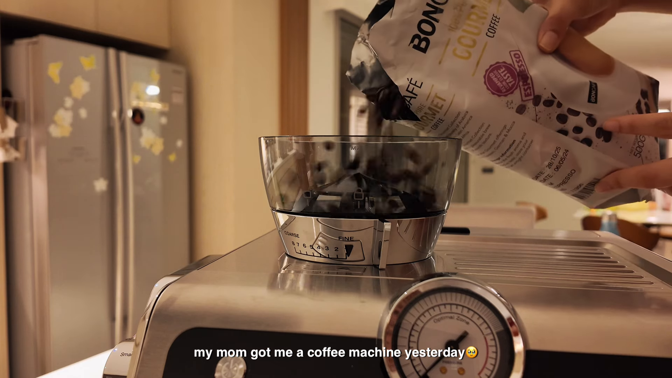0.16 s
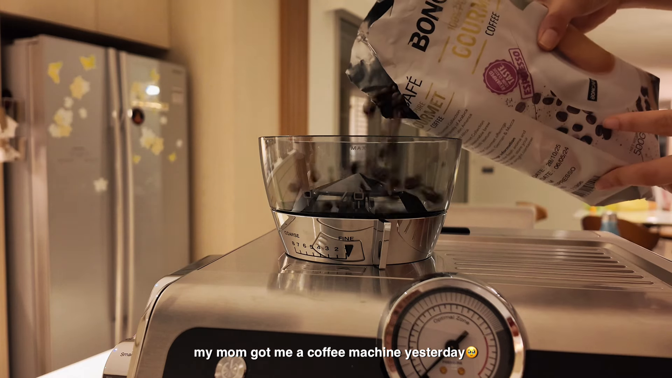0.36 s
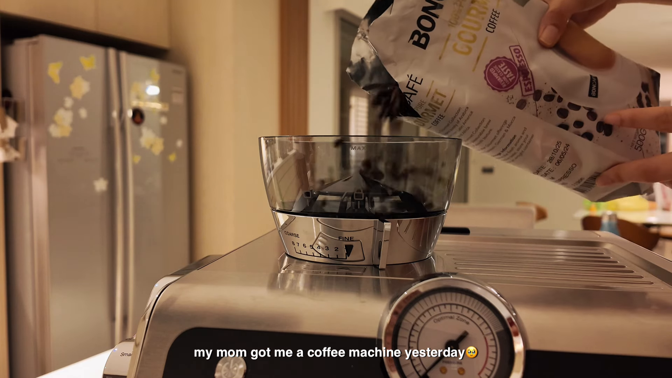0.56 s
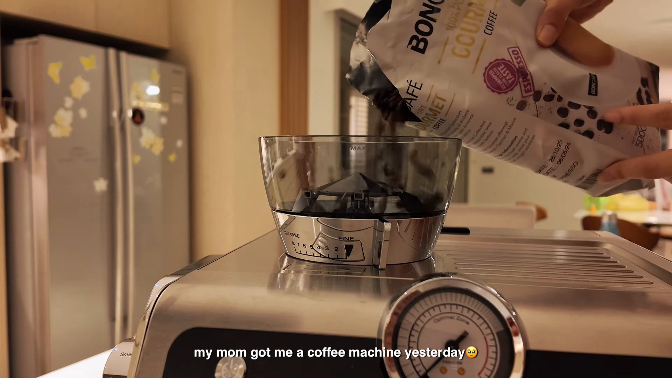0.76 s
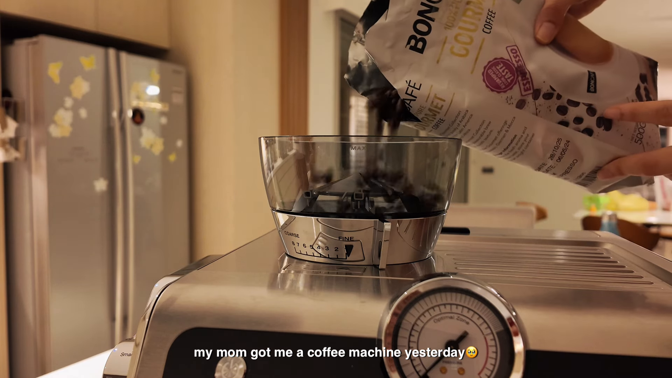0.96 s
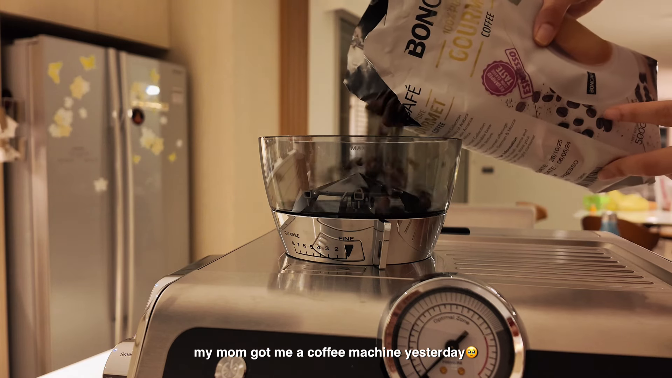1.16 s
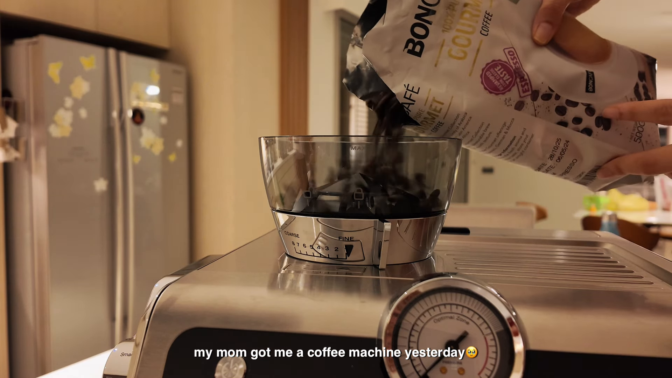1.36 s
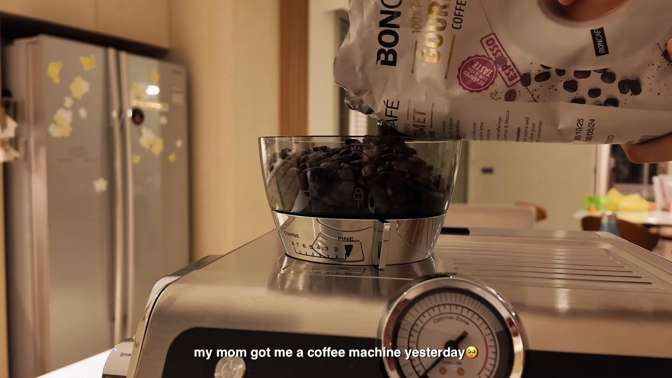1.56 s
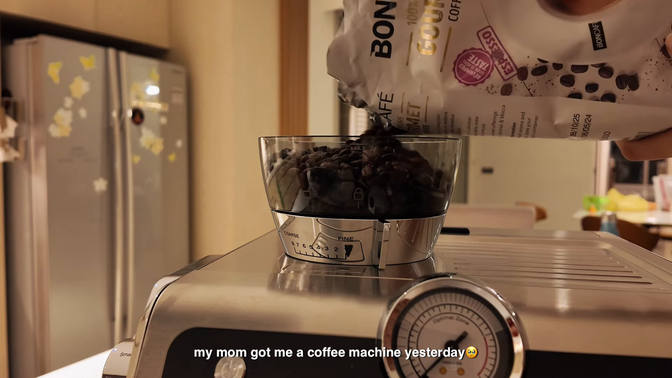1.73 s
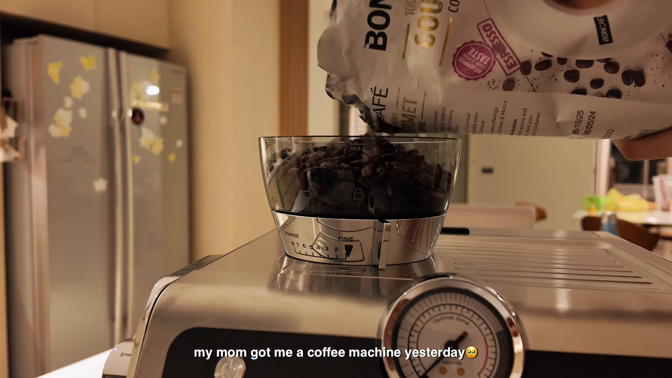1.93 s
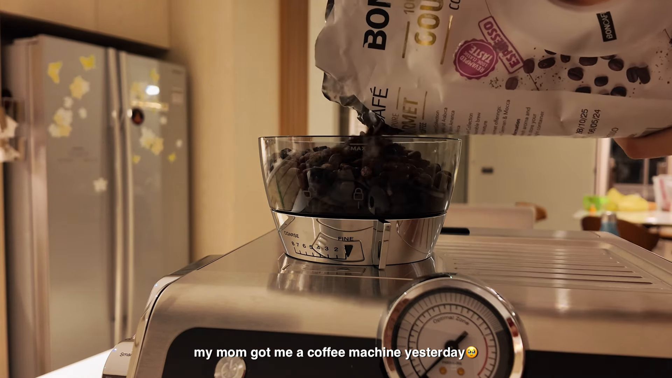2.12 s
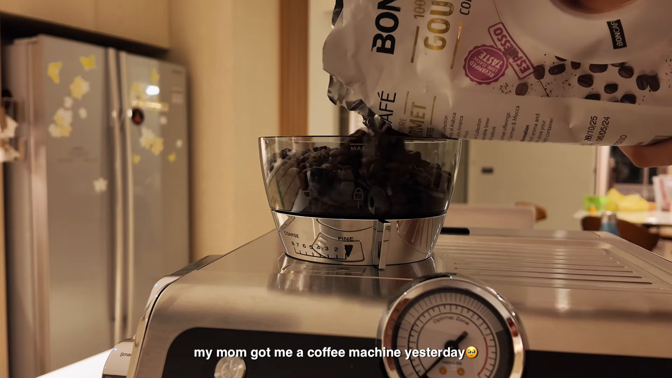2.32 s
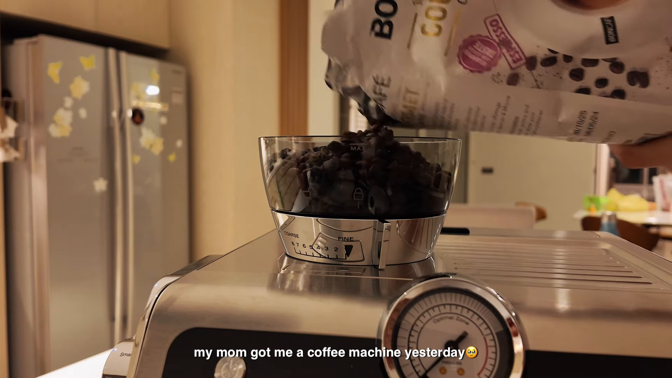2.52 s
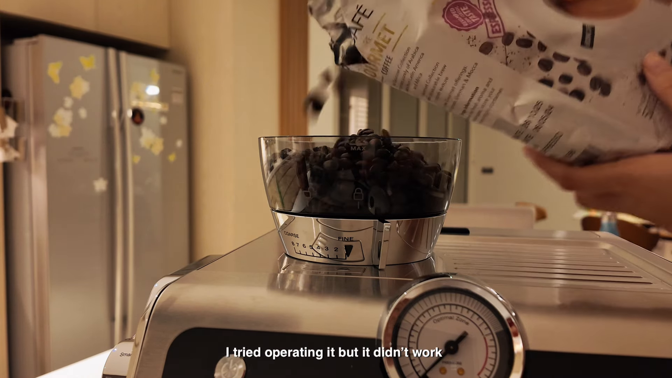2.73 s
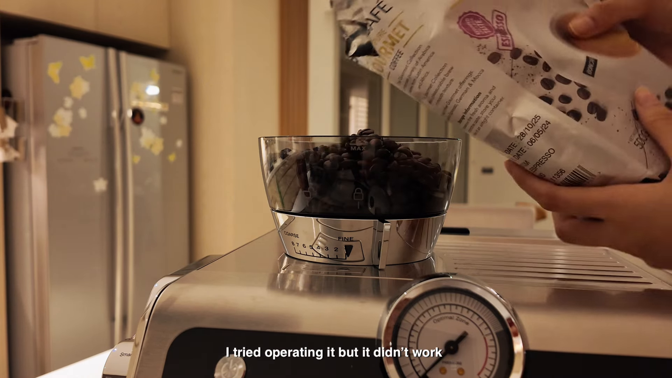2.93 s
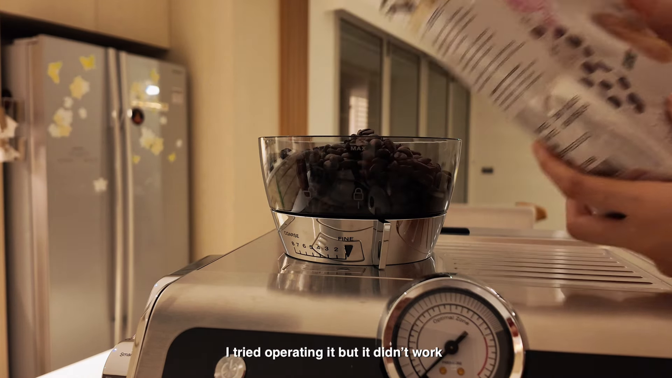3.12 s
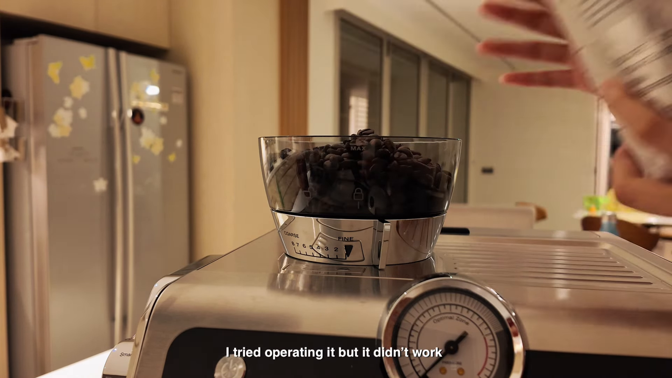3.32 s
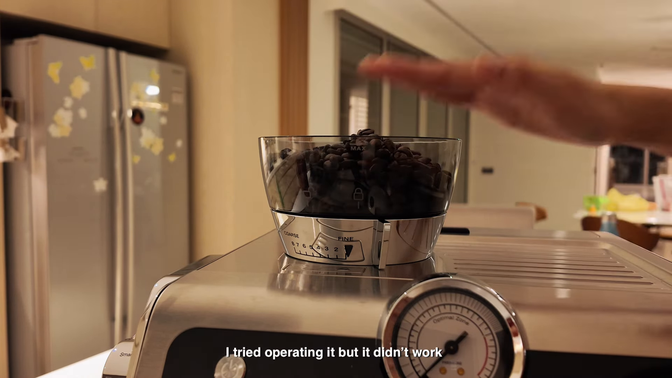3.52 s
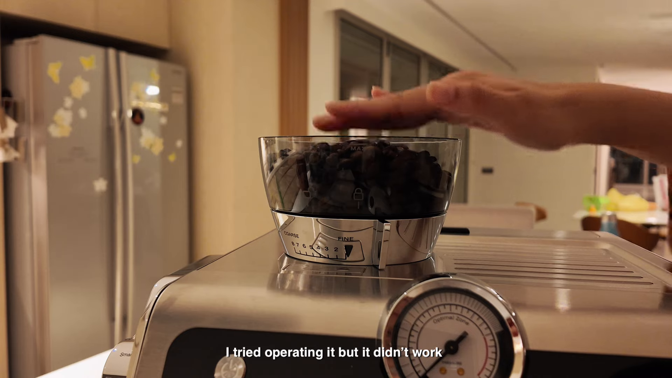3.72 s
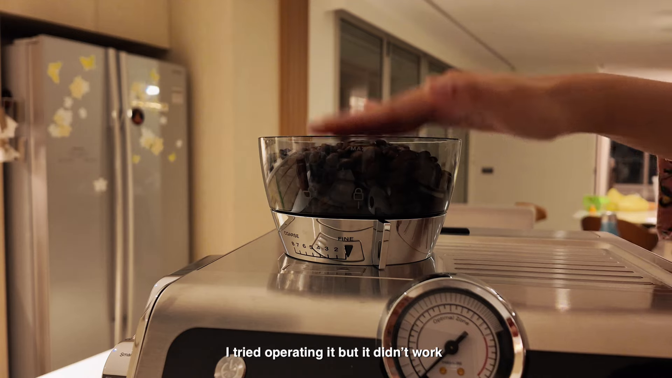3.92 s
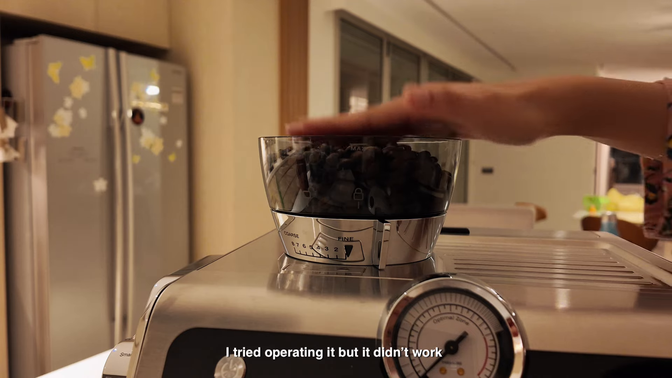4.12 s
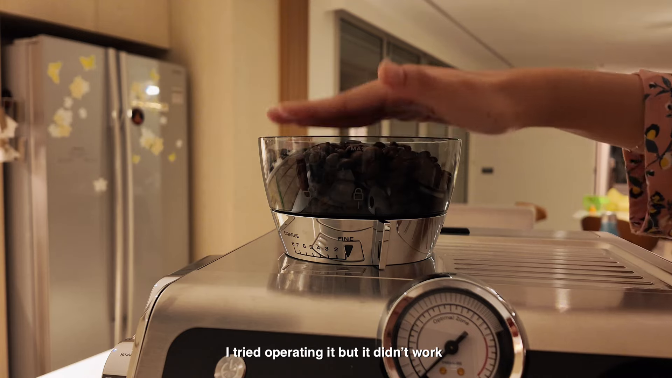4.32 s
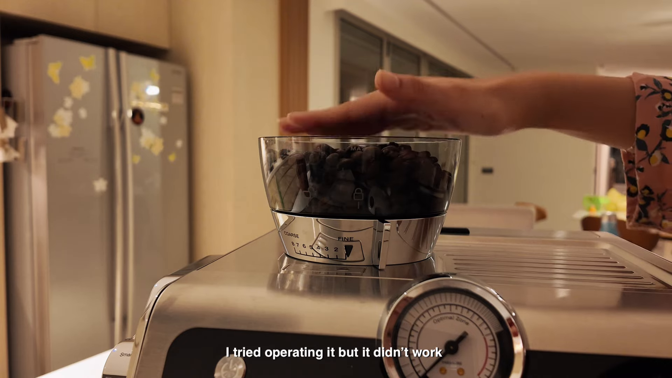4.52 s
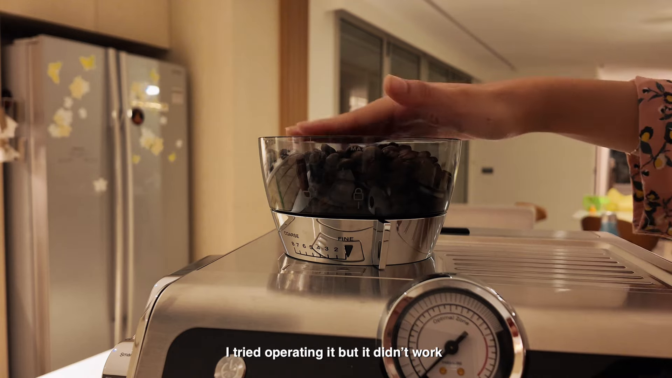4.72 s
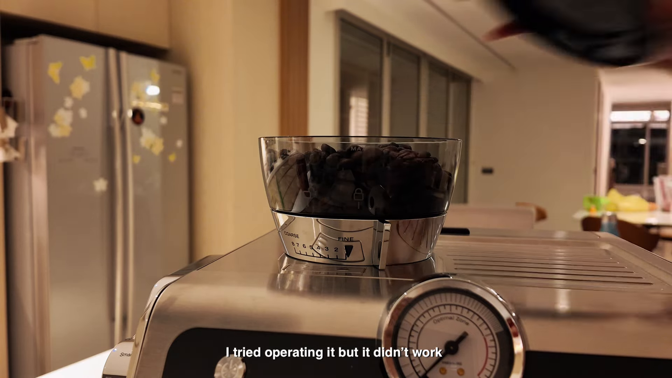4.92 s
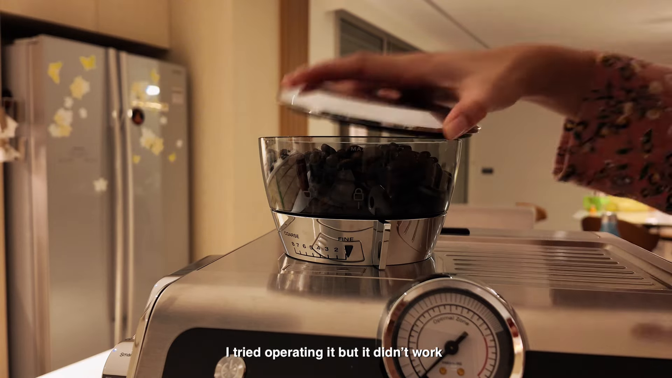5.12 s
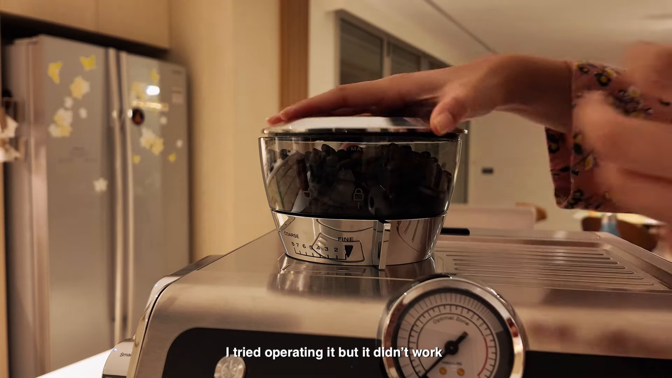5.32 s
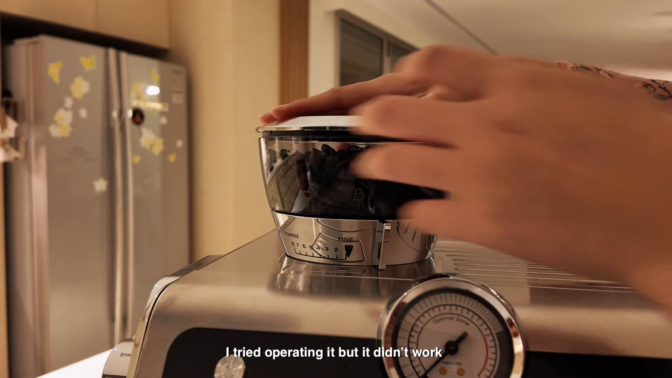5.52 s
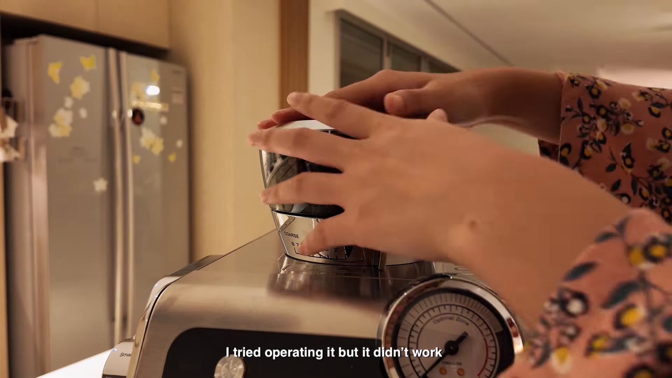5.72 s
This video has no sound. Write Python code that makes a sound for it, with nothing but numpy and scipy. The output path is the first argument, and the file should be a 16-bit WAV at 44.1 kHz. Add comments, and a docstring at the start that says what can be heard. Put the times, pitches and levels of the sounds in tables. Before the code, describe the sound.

Close stereo pickup of beans clattering densely on hollow plastic, ended by a hard edit. Much quieter trickling ticks follow, with crinkly film rustle and crease pops, a sharp cluster of bean hits, then small gritty shifts under a hand. Near the end a lid taps the rim and is pushed down with hollow knocks, low casing thumps and sharp clicks. Soft kitchen air and low hum underneath.

```python
"""Roasted coffee beans pour loudly from a bag into a plastic espresso-machine hopper, then are cut off by an edit.
Random contacts become short noise bursts and bean pings, coloured by the hopper's resonances.
The last beans trickle onto the heap as single ticks; a hand levels them in crunches of dense grains.
The bag is drawn away in rustling grains, low flexing and crease pops; a finger touches the rim.
The lid is set on and pressed home with clicks, ringing modes and thumps, over quiet kitchen air and hum."""
import sys
import numpy as np
from scipy import signal
from scipy.fft import rfft, irfft
from scipy.io import wavfile
from scipy.ndimage import uniform_filter1d

SR = 44100
rng = np.random.default_rng(int(sys.argv[2]) if len(sys.argv) > 2 else 0)


def inscribe(sig):
    """Save sig as 16-bit PCM at rate SR to the path in sys.argv[1].

    A 1-D sig is mono; a 2-D sig holds one channel per row.
    Samples are clipped to [-1, 1] before scaling.
    """
    pcm = np.round(np.clip(np.atleast_2d(sig).T, -1, 1) * 32767)
    wavfile.write(sys.argv[1], SR, pcm.astype(np.int16))


N = 258867
TIME = np.arange(N) / SR  # seconds


def from_db(db):
    """Decibels to gain."""
    return 10 ** (np.asarray(db) / 20)


def rms_one(x):
    """Scale to unit power."""
    return x / np.sqrt(np.mean(x ** 2) + 1e-20)


def at_hz(points, hz):
    """Read a table on a log-frequency axis."""
    f, value = np.transpose(points)
    return np.interp(np.log(hz + 1), np.log(f), value)


def level(s, db):
    """Gain along a level curve, practically silent (-120 dB) outside it."""
    return from_db(np.interp(TIME, s, db, left=-120, right=-120))


def clicks(times, db):
    """One impulse for each contact."""
    out = np.zeros(N)
    out[(np.asarray(times) * SR).astype(int)] = from_db(db)
    return out


def scattered(per_s, start, end):
    """Moments of loosely spaced contacts, one at random in each equal slot."""
    slots = np.arange(start, end - 1 / per_s, 1 / per_s)
    return slots + rng.random(len(slots)) / per_s


def grains(per_s, spread_db):
    """Contacts at random moments and of uneven force, with a steady flow on average."""
    force_db = spread_db * np.clip(rng.standard_normal(N), -2, 2)
    hits = (rng.random(N) < per_s / SR) * from_db(force_db)
    flow = uniform_filter1d(hits ** 2, size=SR // 7)
    return hits / np.sqrt(np.abs(flow) + 1e-9)


# stereo width of the noise, and how much it narrows in the bass (0-1)
SIDE_SHARE, SIDE_TILT = 0.82, 0.69


def stereo_noise(size=N):
    """White noise, less alike left and right towards the treble."""
    mid, side = rng.standard_normal((2, size))
    side = SIDE_SHARE * (side - SIDE_TILT * np.roll(side, 1))
    return (mid + side * [[1], [-1]]) / np.sqrt(1 + SIDE_SHARE ** 2)


def cracks(hits, t60):
    """Every impulse becomes a short dying noise burst; t60 is its 60 dB decay in seconds."""
    energy_decay = from_db(-120 / (t60 * SR))  # gain per sample on squared amplitude
    energy = signal.lfilter([1], [1, -energy_decay], hits ** 2 + 1e-24)
    return np.sqrt(energy) * stereo_noise()


def ring(hits, modes):
    """Resonant modes as two-pole filters: each impulse sets off decaying sines."""
    out = 0
    for hz, db, t60 in modes:
        r = from_db(-60 / (t60 * SR))
        w = 2 * np.pi * hz / SR
        sine = signal.lfilter([0, np.sin(w)], [1, -2 * r * np.cos(w), r * r], hits + 1e-18)
        out = out + from_db(db) * sine
    return out


def colour(x, spectrum, peaks=()):
    """Causal filter of unit power gain: a smooth spectrum lifted by resonances."""
    size = 2 ** 13
    hz = np.arange(size // 2 + 1) * SR / size
    db = at_hz(spectrum, hz)
    for f, width, lift in peaks:
        db = db + lift / (1 + (2 * (hz - f) / width) ** 2)
    bass_cut = 1 + (spectrum[0][0] / 2 / (hz + 1)) ** 2
    gain = rms_one(from_db(db) / bass_cut)
    cepstrum = irfft(np.log(gain))  # folded forward in time, so that nothing sounds early
    cepstrum[1:size // 2] *= 2
    cepstrum[size // 2 + 1:] = 0
    impulse = irfft(np.exp(rfft(cepstrum)))
    return signal.oaconvolve(x, impulse[None], axes=1)[:, :N]


# kitchen reverberation: f/Hz, t60/s
KITCHEN = [(150, 0.64), (600, 0.39), (1500, 0.55), (4500, 0.41), (9000, 0.49), (15000, 0.25)]


def kitchen(x, wet_db):
    """Add a diffuse noise tail that dies at its own rate in each octave."""
    t = np.arange(SR * 3 // 5) / SR
    white = rfft(stereo_noise(size=len(t)))
    hz = np.arange(white.shape[1]) * SR / len(t)
    octave = np.clip(np.round(np.log2(hz / 125 + 1e-9)), 0, 7)
    tail = 0
    for k in range(8):
        band = irfft(white * (octave == k), len(t))
        tail = tail + band * from_db(-60 * t / at_hz(KITCHEN, 125 * 2 ** k))
    tail = tail * np.clip(t / .008 - .5, 0, 1)  # fades in from 4 to 12 ms
    tail /= np.sqrt(np.sum(tail ** 2) / 2)
    return x + from_db(wet_db) * signal.oaconvolve(x, tail, axes=1)[:, :N]


# resonances of beans in the hopper: f/Hz, width/Hz, lift/dB
HOPPER = [(1746, 180, 8), (2950, 150, 5), (4380, 270, 3), (5450, 87, 2.5), (6200, 200, 3.5), (8350, 640, 1),
          (9600, 1000, 0)]


def in_hopper(x, spectrum):
    """Colour a sound and lift it at the hopper's resonances."""
    return colour(x, spectrum, HOPPER)


# tight cluster of thin hopper modes: f/Hz, relative level/dB
RIM_COLOUR = [(3700, -44), (4250, -28), (4430, 9), (4570, 5), (4750, -5), (5400, -27.5), (7000, -54)]


def rim_ring(hits):
    """A hard contact rings on in the thin modes, as a slowly dying narrow band of noise."""
    return colour(cracks(hits, t60=0.68), RIM_COLOUR)


# spectrum of the kitchen air: f/Hz, relative level/dB
ROOM_TONE = [(15, -53.5), (25, -17), (137, -1.5), (206, -3.5), (301, -4.5), (531, -12), (591, -3.5),
             (659, -9.5), (1040, -16), (2760, -26.5), (3080, -23), (5140, -27.5), (11300, -40),
             (14800, -31), (16000, -33)]
AIR_DB, HUM_DB, HUM_HZ = -62, -68, 135


def room_tone():
    """Quiet kitchen air as coloured noise, with a low hum that wavers because noise drives its mode."""
    hum = rms_one(ring(rng.standard_normal(N), [(HUM_HZ, 0, .2)]))
    return from_db(AIR_DB) * colour(stereo_noise(), ROOM_TONE) + from_db(HUM_DB) * hum


# the lid meets the rim under the palm; levels before the layer trims:
# t/s, click level/dB, hollow knock level/dB, casing push level/dB
LID = [(5.163, -49.5, -39.5, -40), (5.18, -47, -61, -38.5), (5.351, -47.5, -58, -34.5),
       (5.373, -49.5, -50, -59), (5.411, -50, -50, -66), (5.4334, -75, -40, -70), (5.461, -67.5, -44, -70),
       (5.649, -47.5, -42.5, -52), (5.665, -27, -36, -35), (5.682, -25, -45.5, -44)]
# spectra of the click and of the knock: f/Hz, relative level/dB
CLICK_COLOUR = [(300, -14), (1500, -31), (3400, -14), (4600, 1), (6000, -11), (9000, -12), (12000, -18.5),
                (16000, -25)]
LID_COLOUR = [(80, -15), (200, 4.5), (350, 2), (520, 0), (800, -14), (1300, -4), (2200, -12), (5000, -32)]
# modes of the lid, then of the machine's casing: f/Hz, relative level/dB, t60/s
LID_MODES = [(670, -26, 0.12), (729, -3, 0.061), (782, -7.5, 0.17), (832, -9, 0.16), (887, -18, 0.19),
             (1340, -25, 0.063), (1590, -10, 0.035), (2660, -12, 0.042)]
CASING = [(89, 3, 0.21), (141, 5.5, 0.11), (184, 1.5, 0.056), (294, -9.5, 0.23)]


def lid():
    """The lid clicks on the rim and knocks hollowly; the palm's push thumps through the casing."""
    s, click_db, knock_db, push_db = np.transpose(LID)
    hits = clicks(s, click_db)
    click = from_db(-1.5) * in_hopper(cracks(hits, t60=0.041), CLICK_COLOUR)
    rim = from_db(-29.5) * rim_ring(hits)
    knock_hits = clicks(s, (click_db + knock_db) / 2)
    knock = from_db(-2.5) * colour(cracks(knock_hits, t60=0.079), LID_COLOUR)
    hollow = 0
    for mode in LID_MODES:  # each contact excites each mode a little differently
        uneven_db = knock_db + rng.normal(0, 2, len(s))
        hollow = hollow + from_db(-5.5) * ring(clicks(s, uneven_db), [mode])
    thump = from_db(-12) * ring(clicks(s, push_db), CASING)
    return kitchen(click + rim + knock + hollow + thump, wet_db=-4)


# the bag is tipped back, held, lifted and swung upright; levels before the layer trims, rise and fall
# per 20 dB: t/s at full strength, rise/s, hold/s, fall/s, rustle level/dB, low flexing level/dB
BAG_MOVES = [(1.466, .03, 0.0092, 0.41, -41, -53), (1.892, 0.2, 0.5, 0.47, -51, -70),
             (3.116, 0.14, 0.015, 0.075, -46.5, -69), (3.45, 0.036, 0.027, 0.36, -52.5, -58),
             (3.673, 0.3, 0.088, 0.15, -41, -47.5)]


def bag_motion():
    """Gains of rustle and flexing: every move of the bag swells, holds and fades."""
    gains = 0
    for s, rise, hold, fall, *db in BAG_MOVES:
        before = np.maximum(s - TIME, 0) / rise
        after = np.maximum(TIME - s - hold, 0) / fall
        shape = from_db(-20 * np.minimum(before + after, 10))
        gains = gains + np.outer(from_db(db), shape)
    return gains


# creases of the bag popping, before the layer trims: t/s, snap level/dB, thud level/dB
CREASES = [(2.025, -35.5, -38.5), (2.182, -33, -49), (2.894, -55, -80), (3.026, -46, -73), (3.12, -39, -46),
           (3.141, -39, -40), (3.206, -50.5, -43), (3.326, -53, -43)]
# spectra of the rustling film and of its flexing panels: f/Hz, relative level/dB
RUSTLE_COLOUR = [(250, -27.5), (500, -5.5), (800, -2.5), (1150, -2.5), (1850, -6.5), (2800, -13.5),
                 (5000, -23), (14000, -45)]
FLEX_COLOUR = [(100, -12), (200, -8), (320, -2.5), (470, 2.5), (650, -2.5), (1200, -21.5), (5000, -47.5)]


def bag():
    """The film of the bag rustles in fine grains, its broad panels flex lower down, and creases pop."""
    rustling, flexing = bag_motion()
    pop_s, snap_db, thud_db = np.transpose(CREASES)
    rustle = rustling * rms_one(cracks(grains(per_s=460, spread_db=4.5), t60=0.019))
    flex = flexing * rms_one(cracks(grains(per_s=220, spread_db=1.5), t60=.025))
    snaps = cracks(clicks(pop_s, snap_db), t60=0.036)
    thuds = from_db(2.5) * cracks(clicks(pop_s, thud_db), t60=0.033)
    film = from_db(-0.5) * colour(rustle + snaps, RUSTLE_COLOUR)
    panels = from_db(-1.5) * colour(flex + thuds, FLEX_COLOUR)
    near = film + panels
    mid = near.mean(axis=0)
    wide = mid + from_db(4) * (near - mid)  # a large surface sounds wide
    return kitchen(wide, wet_db=-1)


# last beans trickling from the bag over the heap, before the layer trim: t/s, level/dB
TRICKLE = [(1.469, -39), (1.81, -46), (2.4, -45), (2.7, -51), (2.9, -49.5), (3.099, -59), (3.2, -87)]
# a handful of beans shifts, in the bag, from its mouth or under the hand; before the layer trim:
# start t/s, length/s, level/dB, swell over its length/dB
SHIFTS = [(2.369, 0.12, -47, 2), (2.707, 0.077, -43, -11), (3.445, 0.21, -57.5, 5),
          (3.606, .042, -35.5, 14.5), (3.661, 0.14, -47.5, -4), (3.841, 0.04, -44, -12),
          (4.068, 0.04, -62, 0), (4.192, 0.048, -56, -2), (4.429, 0.13, -48.5, 9.5),
          (4.607, 0.039, -54.5, 4), (4.839, 0.049, -61, 1.5)]
# spectra of the sliding ticks and of the crunch: f/Hz, relative level/dB
SLIDE_COLOUR = [(500, -13), (2000, -28.5), (3400, -8), (4500, -4.5), (6500, -11.5), (8500, -12),
                (10300, -6), (13000, -6.5), (16000, -11)]
SHIFT_COLOUR = [(400, -16), (1200, -15), (1750, -11), (2400, -9), (3400, -4.5), (4500, 3), (6500, -5.5),
                (9500, -2), (12500, -6), (16000, -10.5)]


def heap():
    """Beans slide over the heap in fine ticks, and crunch when a handful moves together."""
    slide = rms_one(cracks(grains(per_s=460, spread_db=0), t60=0.021))
    ticks = level(*np.transpose(TRICKLE)) * slide
    push = 0
    for s, length, db, swell_db in SHIFTS:
        push = push + level([s, s + length], [db - swell_db / 2, db + swell_db / 2])
    crunch = push * rms_one(cracks(grains(per_s=900, spread_db=4), t60=0.012))
    return from_db(-3.5) * in_hopper(ticks, SLIDE_COLOUR) + from_db(2) * in_hopper(crunch, SHIFT_COLOUR)


# single beans dropping on the heap or against the wall, and a finger touching the rim at 4.07 s;
# before the layer trims: t/s, tick level/dB, wall knock level/dB
CONTACTS = [(1.5569, -35, -62), (1.751, -27, -54), (1.7768, -23, -58), (2.079, -19, -68), (2.086, -19, -64),
            (2.357, -26, -73), (2.38, -16, -52), (2.7476, -22, -58), (2.775, -13, -30.5), (2.780, -3, -52),
            (2.7842, -10, -44), (3.6467, -9, -38.5), (3.6583, -13, -37.5), (4.073, -50, -53.5),
            (4.2166, -48, -48.5), (4.4464, -36, -50), (4.473, -30, -53), (4.541, -21.5, -65),
            (4.901, -52, -57.5)]
# spectra of the dry tick and of the knock on the wall: f/Hz, relative level/dB
BEAN_COLOUR = [(300, -48), (2000, -27), (3400, -28), (4300, 1), (5100, 2.5), (6200, -13), (7200, -8.5),
               (10000, -11.5), (16000, -14)]
WALL_COLOUR = [(200, -49), (800, -11.5), (1750, -1.5), (2500, 1), (3300, 2), (4500, 8), (6000, -0.5),
               (8000, -1.5), (11000, -7.5), (16000, -5.5)]
# beans tumbling singly within the trickle: rate, lift over its level curve before trims, scatter
TUMBLES_PER_S, TUMBLE_DB, TUMBLE_SPREAD_DB = 23, 8.5, 5


def single_contacts():
    """A bean on the heap gives a dry tick; a bean on the wall or a finger on the rim also rings the hopper."""
    s, tick_db, wall_db = np.transpose(CONTACTS)
    trickle_s, trickle_db = np.transpose(TRICKLE)
    moments = scattered(TUMBLES_PER_S, trickle_s[0], trickle_s[-1])
    scatter_db = TUMBLE_SPREAD_DB * rng.standard_normal(len(moments))
    tumbles = clicks(moments, np.interp(moments, trickle_s, trickle_db) + TUMBLE_DB + scatter_db)
    ticks = from_db(-6) * in_hopper(cracks(clicks(s, tick_db) + tumbles, t60=.01), BEAN_COLOUR)
    wall = from_db(6.5) * in_hopper(cracks(clicks(s, wall_db), t60=0.11), WALL_COLOUR)
    hard_blows = clicks(s, (tick_db + wall_db) / 2)  # a sharp hit on the wall drives the thin modes most
    return ticks + wall + from_db(-21.5) * rim_ring(hard_blows)


# range of the short ring of a single bean
BEAN_LOW_HZ, BEAN_HIGH_HZ = 4110, 14340


def bean_rings(hits, t60):
    """Every bean pings briefly at one of twenty pitches, dealt at random."""
    pitches = np.geomspace(BEAN_LOW_HZ, BEAN_HIGH_HZ, 20)
    dealt = rng.integers(0, len(pitches), N)
    pings = 0
    for k, hz in enumerate(pitches):
        pings = pings + ring(hits * (dealt == k), [(hz, 0, t60)])
    return rms_one(pings)


# flow of the stream into the nearly empty hopper: t/s, level/dB
POUR = [(0.02, -21.5), (0.85, -25), (0.902, -22.5), (1.242, -23), (1.278, -20), (1.298, -24), (1.46, -20.5)]
# spectrum of the clatter: f/Hz, relative level/dB
POUR_COLOUR = [(150, -33), (400, -35), (700, -25), (1300, -16.5), (1750, -18), (2500, -14.5), (3450, -10),
               (4150, -0.5), (5100, -4), (7200, -8), (9700, -4.5), (13000, -9.5), (16000, -16.5)]
POUR_CUT_S, POUR_HITS_PER_S = 1.473, 630
# beans that hit the bare plastic squarely: rate, onset level above the stream, scatter of that level
STRIKES_PER_S, STRIKE_DB, STRIKE_SPREAD_DB = 26, 0.5, 3


def pour():
    """Hundreds of beans a second clack on plastic and each other, until an edit cuts them and their room tail."""
    flow = from_db(np.interp(TIME, *np.transpose(POUR)))
    hits = grains(POUR_HITS_PER_S, spread_db=0)
    clacks = rms_one(cracks(hits, t60=.02))
    stream = rms_one(clacks + from_db(-9) * bean_rings(hits, t60=0.015))
    moments = scattered(STRIKES_PER_S, 0, POUR_CUT_S)
    strike_db = STRIKE_DB + STRIKE_SPREAD_DB * rng.standard_normal(len(moments))
    strikes = cracks(clicks(moments, strike_db), t60=0.033)
    clatter = in_hopper(flow * (stream + strikes), POUR_COLOUR)
    cut = np.clip((POUR_CUT_S - TIME) / 0.023 + .5, 0, 1)  # a 23 ms fade around the cut
    return kitchen(clatter, wet_db=-7) * cut


def scene():
    """All sources, the beans a little to the right."""
    beans = pour() + kitchen(heap() + single_contacts(), wet_db=-7.5)
    return beans * from_db([[-.25], [.25]]) + bag() + lid() + room_tone()


def record(dry):
    """The microphone drops the deepest bass below 54 Hz; the top is cut steeply at 16.1 kHz."""
    bass_cut = signal.butter(6, 54, "high", fs=SR, output="sos")
    top_cut = signal.ellip(10, .2, 80, 16100, fs=SR, output="sos")
    return signal.sosfilt(top_cut, signal.sosfilt(bass_cut, dry))


dry = scene()
out = record(dry)
inscribe(out)
```